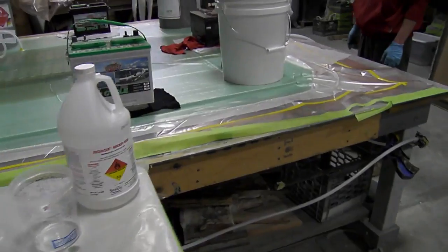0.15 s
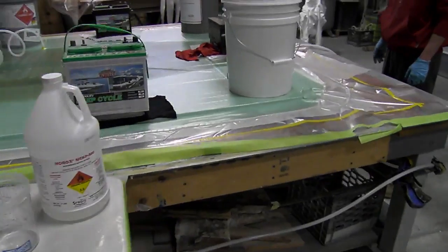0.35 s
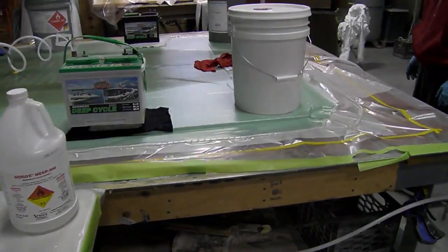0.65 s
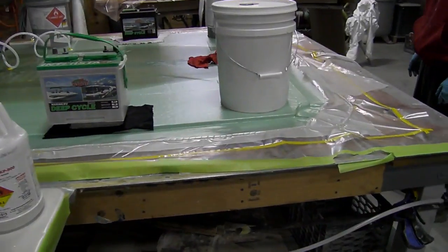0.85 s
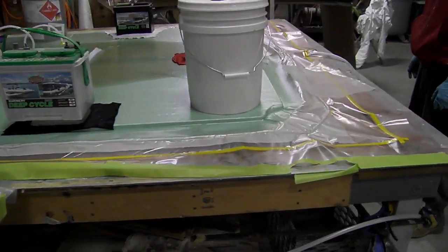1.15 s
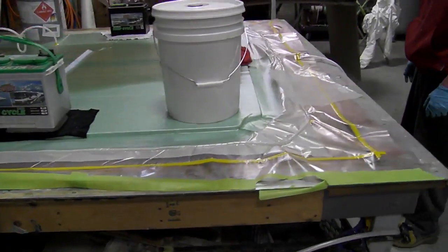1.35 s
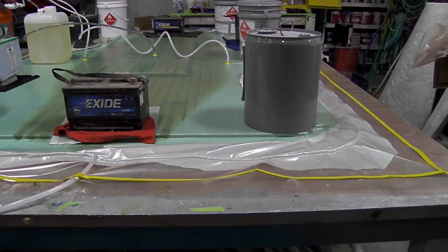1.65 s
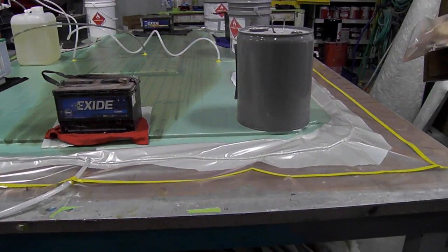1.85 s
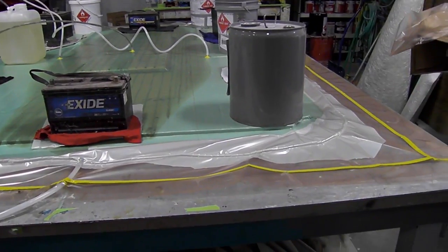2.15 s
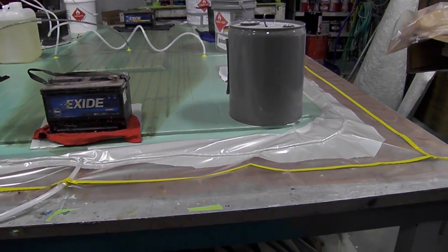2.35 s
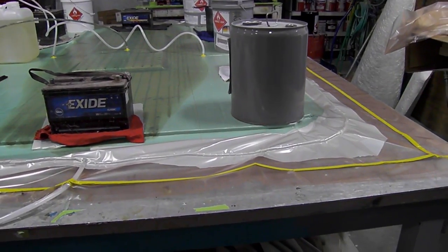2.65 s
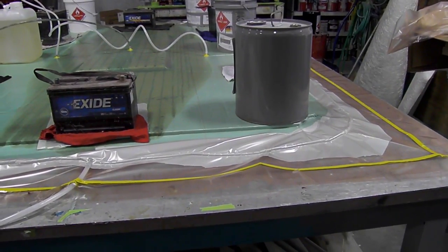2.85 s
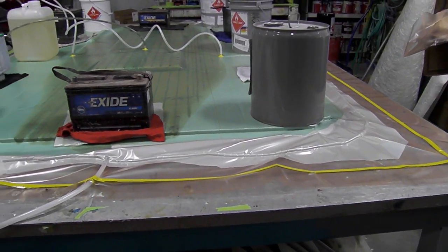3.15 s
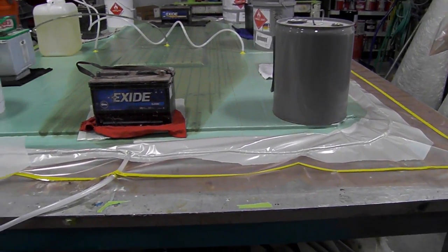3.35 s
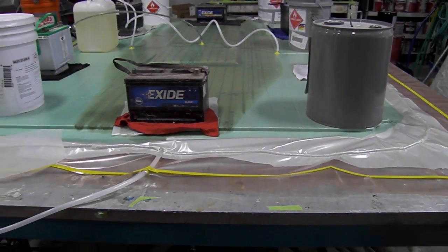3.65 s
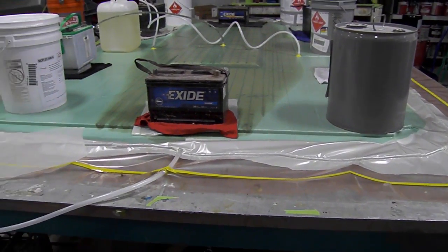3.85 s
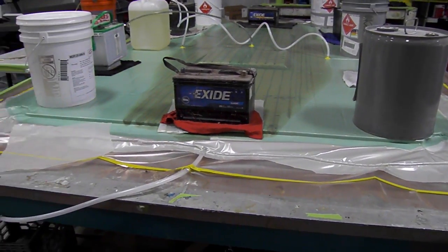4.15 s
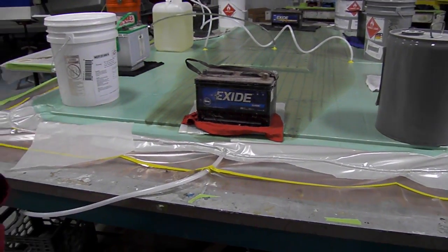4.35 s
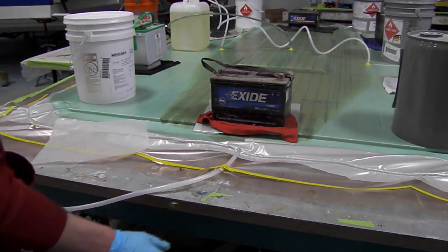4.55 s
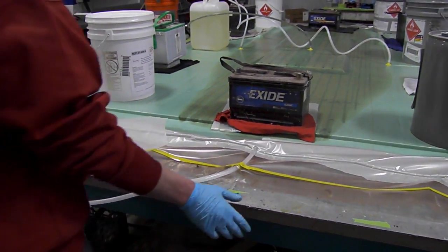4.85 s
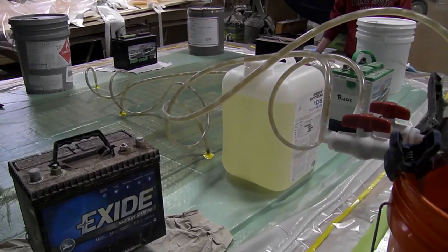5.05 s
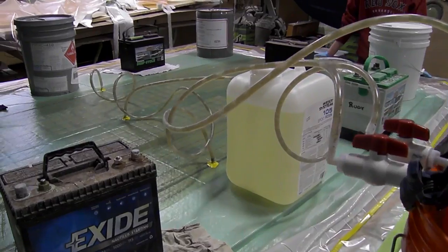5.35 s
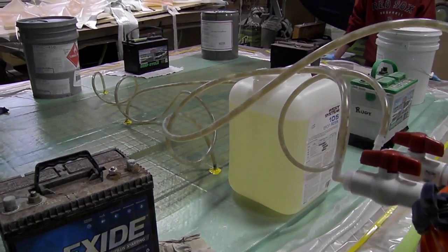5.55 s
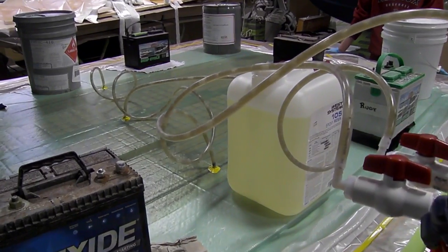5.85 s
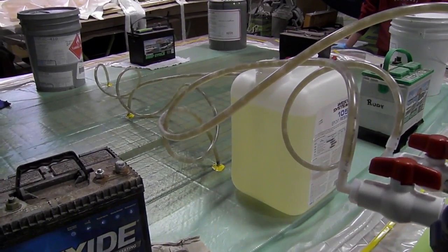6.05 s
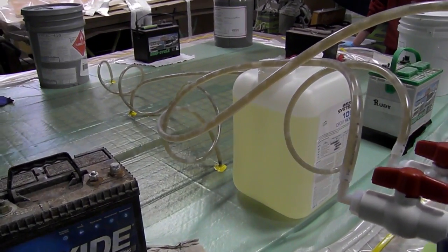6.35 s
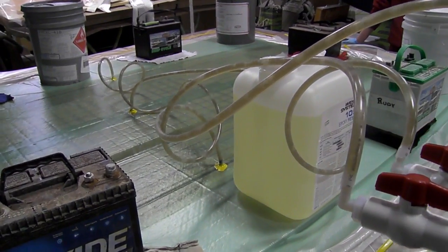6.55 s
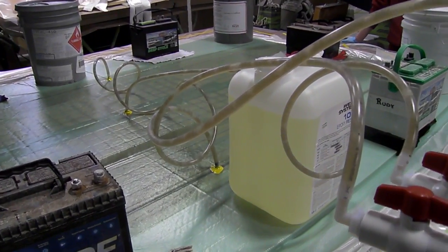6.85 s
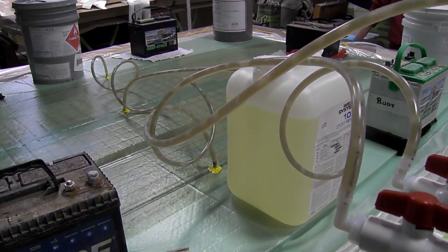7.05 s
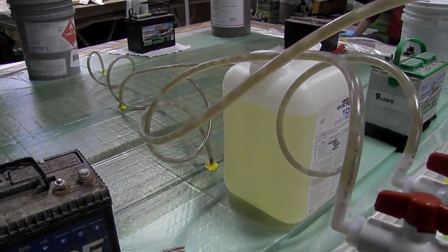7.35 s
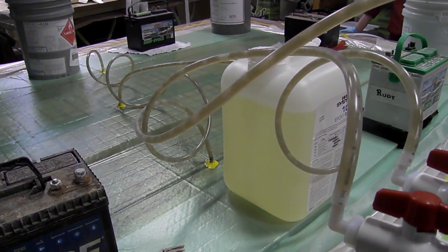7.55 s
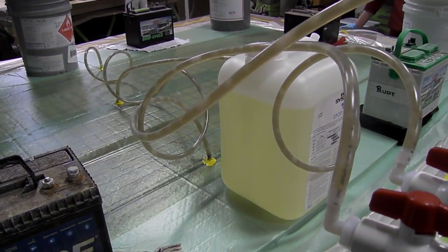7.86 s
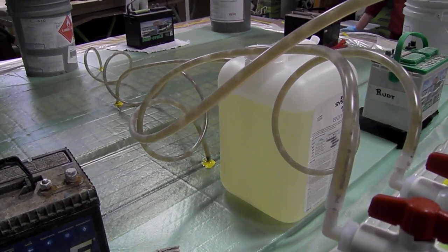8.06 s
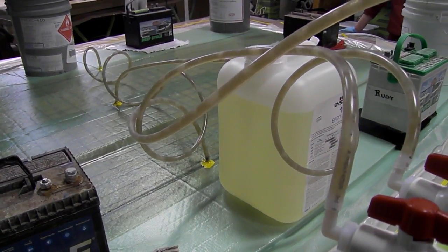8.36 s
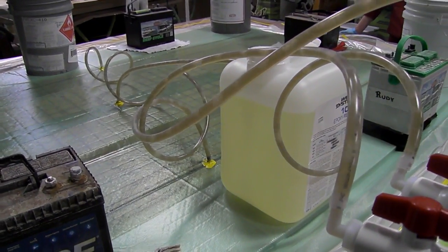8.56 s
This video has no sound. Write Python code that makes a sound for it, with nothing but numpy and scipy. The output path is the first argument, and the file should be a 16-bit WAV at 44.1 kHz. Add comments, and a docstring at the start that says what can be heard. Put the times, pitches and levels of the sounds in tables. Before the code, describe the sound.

Heard first from across a workshop, a vacuum pump drones and rattles at constant speed under a high air hiss. The microphone jumps to a quieter spot, where a brief tape-like rip, a tick and a smaller rip sound over the pump. A split-second gap leads to a close position by the hoses, where the leak hisses and whistles strongly before settling, with a couple of small ticks and a faint scrape.

```python
"""Vacuum pump in a boat shop

A pump spins four vanes (sliding blades) whose puffs of air make tones. Its motor hums, its casing
clatters and rings, and a leak hisses and whistles. We listen from across the room, then from the
bench, where it is quieter, and, after an instant of silence, close to the hoses. From the bench come
a few ticks, two short rasps like tape being pulled, and a faint scrape."""
import sys
import numpy as np
from scipy import signal
from scipy.fft import rfft, irfft, next_fast_len
from scipy.io import wavfile
from scipy.ndimage import uniform_filter1d, map_coordinates

SR = 44100
rng = np.random.default_rng(int(sys.argv[2]) if len(sys.argv) > 2 else 0)


def master_out(mix):
    """Clip the mix to full scale and print it as 16-bit PCM to the path in sys.argv[1]."""
    frames = np.transpose(np.atleast_2d(mix))
    ceiling = np.clip(frames, -1, 1)
    pcm = np.round(ceiling * 32767).astype(np.int16)
    wavfile.write(sys.argv[1], SR, pcm)


N = 383669
VANES, TOP_HZ = 4, 15720

# when we listen from each spot: (start [s], end [s])
SPOT_TIMES = [(-1, 1.527), (1.504, 5.042), (5.088, 9)]
# how fast the pump's shaft spins: (time [s], speed [turns/s])
SHAFT_SPEED = [(0, 28.47), (3.5, 28.48), (5.2, 28.43), (8.7, 28.41)]


def amp(db):
    """Turn decibels into a number to multiply a sound by."""
    return 10 ** (np.asarray(db) / 20)


def unit(x):
    """Scale a sound so that its average strength (rms) is 1."""
    return x / np.sqrt(np.mean(x ** 2) + 1e-20)


def level_at_pitch(spectrum, hz):
    """Read between (frequency, level) points, with octaves evenly spaced."""
    pitches, levels = np.transpose(spectrum)
    return np.interp(np.log(hz + 1), np.log(pitches + 1), levels)


def over_time(points, t):
    """Join (time, value) points with straight lines."""
    return np.interp(t, *np.transpose(points))


def at_spot(table, spot):
    """Pick a table's first column and the column for this listening spot."""
    return [(row[0], row[spot + 1]) for row in table]


def wobble(per_s, size):
    """A smooth curve through per_s random values each second."""
    values = rng.standard_normal(int(size * per_s / SR) + 4)
    coarse = np.linspace(0, size, 1500)
    return np.interp(np.arange(size), coarse, map_coordinates(values, [coarse * per_s / SR]))


def filtered(x, response):
    """Turn each frequency up or down by response(hz)."""
    size = next_fast_len(len(x) + SR // 10)
    return irfft(rfft(x, size) * response(np.fft.rfftfreq(size, 1 / SR)), size)[:len(x)]


def coloured(x, spectrum):
    """Shape a sound's lows and highs, then scale it to strength 1."""
    return unit(filtered(x, lambda hz: amp(level_at_pitch(spectrum, hz))))


def resonance(hz, centre_hz, width_hz):
    """How something that rings near one pitch answers each frequency."""
    return 1j * hz * width_hz / (centre_hz ** 2 - hz ** 2 + 1j * hz * width_hz)


def tones(cycles, rows, waver):
    """Pure tones at (multiple, level) of a cycle count; room echoes make each one waver."""
    out = np.zeros(len(cycles))
    for multiple, db in rows:
        angle = 2 * np.pi * (multiple * cycles + rng.random())
        out += amp(db) * (1 + waver * wobble(2.96, len(cycles))) * np.sin(angle)
    return np.sqrt(2) * out


def rattle(turns, spectrum, share, vane_db, size=8192):
    """Noise of which a share repeats on every turn, and most strongly on every vane."""
    multiple = np.arange(size // 2 + 1)
    hz = multiple * SHAFT_SPEED[0][1]
    db = level_at_pitch(spectrum, hz) + vane_db * (multiple % VANES == 0)
    one_turn = irfft(rfft(rng.standard_normal(size)) * amp(db) * (hz < TOP_HZ))
    repeating = np.interp(turns % 1, np.arange(size) / size, one_turn, period=1)
    fresh = coloured(rng.standard_normal(len(turns)), spectrum)
    return np.sqrt(share) * unit(repeating) + np.sqrt(1 - share) * fresh


def throb(turns, turn_db, vane_db):
    """The flow swells once a turn, and as each vane passes the inlet and the outlet."""
    angle = 2 * np.pi * turns
    return amp(turn_db * np.cos(angle) + vane_db * np.cos(2 * VANES * angle))


def standing_waves(x, depth_db, size=2048):
    """Wall echoes lift some pitches and weaken others; the pattern drifts as the listener moves."""
    slices = signal.stft(x, nperseg=size)[2]
    pattern = uniform_filter1d(rng.standard_normal(slices.shape), 4, axis=0)  # smooth across pitch
    pattern = unit(uniform_filter1d(pattern, 70, axis=1))  # and across time
    return unit(signal.istft(slices * amp(depth_db * pattern), nperseg=size)[1][:len(x)])


def ringing(rings, spot, size, flutter_db):
    """Swirling air feeds bands of ringing; if they flutter, the narrow ones flutter most."""
    out = np.zeros(size)
    for centre_hz, width_hz, *db in rings:
        ring = filtered(rng.standard_normal(size), lambda hz: resonance(hz, centre_hz, width_hz) ** 2)
        flutter = amp(flutter_db / (1 + width_hz / 400) * wobble(21.94, size))
        out += amp(db[spot]) * unit(ring * flutter)
    return out


def pump_roar(turns, spot):
    """The pump's low rushing noise, which repeats a little with each turn."""
    # tone colour of the roar: (frequency [Hz], relative level at spot 1, 2, 3 [dB])
    spectrum = [(25, -21, -21, -21), (80, -16, -21.5, -18), (139, -13, -12, -19), (200, -9.5, -8, -11.5),
                (282, -5.5, -5.5, -11), (400, -4.5, -5.5, -4.5), (600, -2, -4, -3.5), (850, 2.5, 0, -1.5),
                (1130, -3, -5.5, -5.5), (1400, -1.5, -9.5, -6), (2200, -32, -38, -39)]
    return rattle(turns, at_spot(spectrum, spot), share=.12, vane_db=5)


def casing_clatter(turns, unsteady_turns, spot):
    """The pump's casing rattles with each turn and rings at its own pitches."""
    # tone colour of the rattle: (frequency [Hz], relative level at spot 1, 2, 3 [dB])
    spectrum = [(910, -40, -44, -35.5), (1350, -12, -5, -8), (1640, -7.5, -3, -7.5), (1920, 0, 0, -3),
                (2100, 0.5, -0.5, 0), (2450, -0.5, 1, -0.5), (2790, -2, -2, -1.5), (3010, -9, -8.5, -8.5),
                (3400, -12, -8, -7.5), (4170, -15.5, -9, -6.5), (5570, -28, -26, -28)]
    # where the casing rings: (pitch [Hz], width [Hz], relative level at spot 1, 2, 3 [dB])
    rings = [(1881, 30, -13, -8, -9), (1990, 40, -14, -14.5, -14), (2762, 79, -12, -11.5, -17),
             (3494, 70, -24, -19.5, -18)]
    rattling = rattle(unsteady_turns, at_spot(spectrum, spot), share=.32, vane_db=2.5)
    rattling = amp(1.5) * standing_waves(rattling, depth_db=.76)
    ring = ringing(rings, spot, len(turns), flutter_db=0)
    return (rattling + ring) * throb(turns, turn_db=.4, vane_db=.3)


def air_leak(t, turns, unsteady_turns, spot, hiss_db, whistle_db):
    """A jet of air hisses and whistles, pulsing with the pump's flow."""
    # tone colour of the hiss: (frequency [Hz], relative level at spot 1, 2, 3 [dB])
    spectrum = [(3520, -30, -30, -35), (4750, -0.5, 1.5, -1), (5500, -2, -1, -1), (6450, -4.5, -2, 1),
                (7100, -0.5, 0, 3.5), (8100, -2, -3, 0.5), (10000, 5.5, 1, 1.5), (11230, 1, 1, -2.5),
                (12600, 1, -3.5, -3), (14400, 2, -4.5, .5), (15400, -1.5, -6, -1.5)]
    # the jet's whistles: (pitch [Hz], width [Hz], relative level at spot 1, 2, 3 [dB])
    whistles = [(5980, 130, -22.5, -17, -12.5), (8930, 1400, -4, -4.5, -3.5), (9205, 130, -6.5, -8, -7.5),
                (9680, 170, -7.5, -13, -11), (14640, 280, -16, -23, -12.5)]
    # whistling travels in a beam, so it swells as the listener turns: (time [s], level change [dB])
    swing = [(0, 2), (.42, 3.5), (.57, -3.5), (1, -2.5), (1.25, 1), (1.6, 0), (5.7, 0), (6.4, 2.2), (8, 0)]
    hiss = rattle(unsteady_turns, at_spot(spectrum, spot), share=.18, vane_db=8.5)
    hiss = amp(hiss_db) * standing_waves(hiss, depth_db=1.86)
    whistle = ringing(whistles, spot, len(t), flutter_db=1.4)
    whistle = amp(whistle_db + over_time(swing, t)) * standing_waves(whistle, depth_db=2.2)
    return (hiss + whistle) * throb(turns, turn_db=.85, vane_db=.55) * amp(.22 * wobble(12, len(t)))


def vane_tone(t, turns, multiple=28):
    """The main vane tone chugs: it swells and lags once on every turn, never twice quite alike."""
    # the listener moves through the room's loud and quiet places: (time [s], level change [dB])
    swing = [(0, 2), (.25, -6.5), (.65, -9), (1, 2), (1.2, -1.5), (1.55, 0), (2.2, 5), (3.9, 5), (4.9, -2),
             (6, 0)]
    angle = 2 * np.pi * turns
    swell = 1 + .5 * np.cos(angle) * (1 + .35 * wobble(12, len(t)))
    tone = swell * np.sin(multiple * angle - .35 * np.sin(angle) + .25 * wobble(30, len(t)))
    return np.sqrt(2) * tone * amp(over_time(swing, t) + .6 * wobble(8, len(t)))


def casing_whine(t, turns, multiple=66, beat_hz=6.8, upper_db=-9):
    """A shaft tone sits on the casing's sharpest ring and pulses against a tone just above it."""
    angle = 2 * np.pi * multiple * turns
    beat = 2 * np.pi * beat_hz * t + .7 * wobble(5, len(t))
    pair = np.sin(angle) + amp(upper_db) * np.sin(angle + beat)
    return unit(pair * amp(.6 * wobble(18, len(t))))


def shaft_hum(t, turns, spot, swinging_multiple=16):
    """The vanes' pressure pulses make clean tones that follow the shaft's speed."""
    # the tones: (pitch [times shaft speed], base level at spot 1, 2, 3 [dB])
    shaft_tones = [(4, -65, -64, -59), (8, -42.5, -53, -49.5), (12, -45, -41.7, -45.7), (16, -42, -54, -47),
                   (21, -52, -55, -48), (24, -53, -51.5, -50), (31, -48, -61, -47), (65, -38, -46, -50),
                   (70, -36, -47, -48), (78, -37, -45, -43.5), (90, -40, -46, -65), (160, -50, -58, -51),
                   (296, -46, -56, -43), (303, -44, -56, -36), (309, -37, -51, -40), (319, -35, -51, -40),
                   (325, -35, -46, -35.5)]
    # one tone has its own loud and quiet places in the room: (time [s], level change [dB])
    swing = [(0, -1), (.4, 4.5), (.8, -9), (1.05, -1), (1.55, -1)]
    rows = at_spot(shaft_tones, spot)
    low = tones(turns, [row for row in rows if row[0] < swinging_multiple], waver=.12)
    high = tones(turns, [row for row in rows if row[0] > swinging_multiple], waver=.22)
    swinging = tones(turns, [row for row in rows if row[0] == swinging_multiple], waver=.15)
    return low + high + amp(over_time(swing, t)) * swinging


def motor_hum(t, spot, mains_hz=60):
    """The motor's magnetism hums at multiples of the power supply's frequency."""
    # the hum's tones: (pitch [times mains_hz], relative level at spot 1, 2, 3 [dB])
    hum_tones = [(6, -50, -48.5, -55), (10, -56, -50, -53.5), (16, -50, -52, -58), (18, -49, -53, -57),
                 (20, -52, -57, -58), (22, -40, -48, -50), (24, -43, -45, -52.5), (26, -40, -53, -54),
                 (28, -43, -43.5, -52), (30, -52, -44, -61)]
    return amp(-1) * tones(mains_hz * t, at_spot(hum_tones, spot), waver=.2)


def faint_whine(t, spot):
    """Thin tones that do not follow the shaft."""
    # the whine's tones: (pitch [Hz], relative level at spot 1, 2, 3 [dB])
    whine_tones = [(696.4, -46, -57, -48), (1255, -42, -61, -53.5), (1610, -59, -64, -49),
                   (2383, -41, -50, -44.5)]
    return amp(-.5) * tones(t, at_spot(whine_tones, spot), waver=.34)


def nearness(t, draw_back_s=5.3, ease_s=1.3):
    """1 right at the leak, easing to 0 as the listener draws back."""
    return np.exp(-(np.maximum(t - draw_back_s, 0) / ease_s) ** 2)


def pump_from(spot, t, turns):
    """The pump and its leak heard from one spot; the last spot begins right at the leak."""
    # base levels, a row per spot:
    # (roar [dB], clatter [dB], hiss [dB], whistle [dB], vane tone [dB], casing whine [dB])
    levels = [(-35, -23.8, -23.2, -23.7, -31.7, -29.6), (-40.2, -32.9, -31.1, -34.2, -45.2, -36.4),
              (-37.6, -35.2, -22.2, -25.2, -32.3, -37.8)]
    # how those levels change right at the leak: same columns [dB]
    near_changes = (0, 2.8, 4.5, 5.5, -2.5, -6)
    near = nearness(t) * (spot == len(SPOT_TIMES) - 1)
    mix = [db + near * change for db, change in zip(levels[spot], near_changes)]
    roar_db, clatter_db, hiss_db, whistle_db, vane_db, whine_db = mix
    unsteady_turns = turns + .0003 * wobble(14, len(t))  # slight speed flutter blurs the highest tones
    out = amp(roar_db) * pump_roar(turns, spot)
    out += amp(clatter_db) * casing_clatter(turns, unsteady_turns, spot)
    out += air_leak(t, turns, unsteady_turns, spot, hiss_db, whistle_db)
    out += amp(vane_db) * vane_tone(t, turns)
    out += amp(whine_db) * casing_whine(t, turns)
    out += amp(3.5 * (near - near.mean())) * shaft_hum(t, turns, spot)
    return out + motor_hum(t, spot) + faint_whine(t, spot)


def pump(fade_s=.008):
    """The shaft keeps turning while we listen from one spot after another."""
    t = np.arange(N) / SR
    turns = np.cumsum(over_time(SHAFT_SPEED, t)) / SR
    out = np.zeros(N)
    for spot, (start, end) in enumerate(SPOT_TIMES):
        fade = np.clip(np.minimum(t - start, end - t) / fade_s + .5, 0, 1)
        here = fade > 0
        out[here] += fade[here] * pump_from(spot, t[here], turns[here])
    return out


def ticks():
    """Light contacts on the bench: each is a dull or bright puff of noise that dies at once."""
    # the contacts: (time [s], level [dB], pitch [Hz], time to fade by 60 dB [s])
    contacts = [(.322, -25, 480, .06), (.358, -23, 500, .05), (3.3374, -13, 3200, .01),
                (6.8375, -16, 2600, .01), (7.09, -26, 1400, .04)]
    out, t = np.zeros(N + SR), np.arange(SR // 5) / SR
    for start, db, centre_hz, fade_s in contacts:
        noise = rng.standard_normal(len(t))
        puff = unit(filtered(noise, lambda hz: resonance(hz, centre_hz, width_hz=centre_hz)))
        out[round(start * SR):][:len(t)] += amp(db - 60 * t / fade_s) * puff
    return out[:N]


def hand_stroke(start, rise, length, db, sag_db_per_s, release_s):
    """Loudness of one hand movement: it rises, sags and dies when the hand stops."""
    t = np.arange(N) / SR - start
    fall_db = sag_db_per_s * np.maximum(t - rise, 0) + 60 * np.maximum(t - length, 0) / release_s
    return np.clip(t / rise, 0, 1) * amp(db - fall_db)


def tape(snaps_per_s=6000):
    """Glue lets go in a dense run of tiny snaps; each pull slackens as it goes."""
    # the pulls: (start [s], rise [s], length [s], level [dB])
    pulls = [(1.647, .005, .12, -16), (4.718, .032, .058, -22.5)]
    # tone colour of the rasp: (frequency [Hz], relative level [dB])
    spectrum = [(300, -40), (1200, -14), (1750, -4), (2700, -2), (3400, -0.5), (4200, -8.5), (5200, -9.5),
                (6200, -22.5), (12000, -25)]
    loudness = sum(hand_stroke(*pull, sag_db_per_s=58, release_s=.05) for pull in pulls)
    snaps = (rng.random(N) < snaps_per_s / SR) * rng.standard_normal(N)
    return loudness * coloured(unit(snaps) + rng.standard_normal(N), spectrum)


def scrape():
    """Something slides: a soft rub with a thin squeak on top."""
    # the slide: (start [s], rise [s], length [s], level [dB])
    slide = (8.3, .04, .15, -31)
    squeak = lambda hz: resonance(hz, centre_hz=4170, width_hz=90)
    rub = lambda hz: amp(-11) * resonance(hz, centre_hz=2300, width_hz=1600)
    friction = unit(filtered(rng.standard_normal(N), lambda hz: squeak(hz) + rub(hz)))
    return hand_stroke(*slide, sag_db_per_s=40, release_s=.2) * friction


def scene():
    """Everything reaches one microphone, so left and right are the same."""
    mono = pump() + ticks() + tape() + scrape()
    return np.array([mono, mono])


def record(dry):
    """The microphone loses a narrow band of treble and cuts off around TOP_HZ."""
    notch = lambda hz: 1 - resonance(hz, centre_hz=7870, width_hz=390)
    cutoff = lambda hz: np.clip((TOP_HZ - hz) / 200 + .5, 0, 1)
    return np.array([filtered(channel, lambda hz: notch(hz) * cutoff(hz)) for channel in dry])


dry = scene()
out = record(dry)
master_out(out)
```